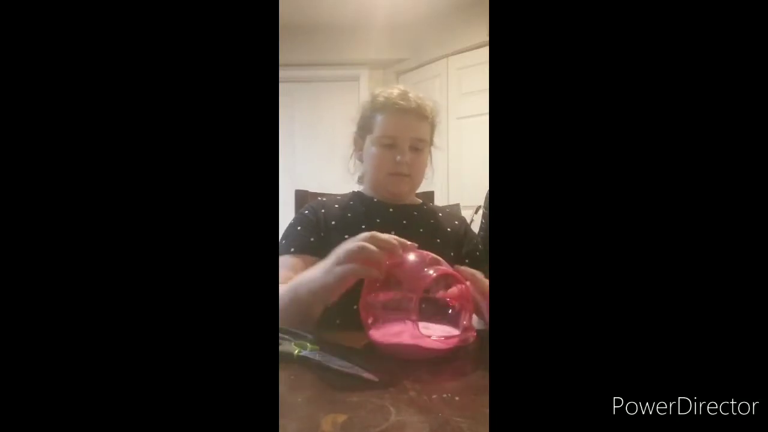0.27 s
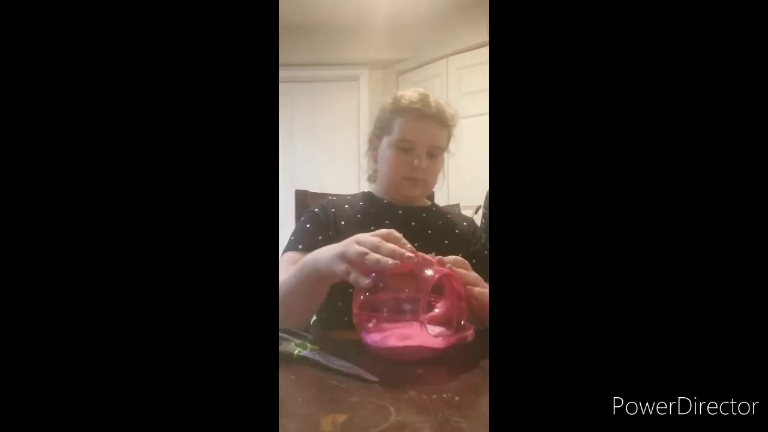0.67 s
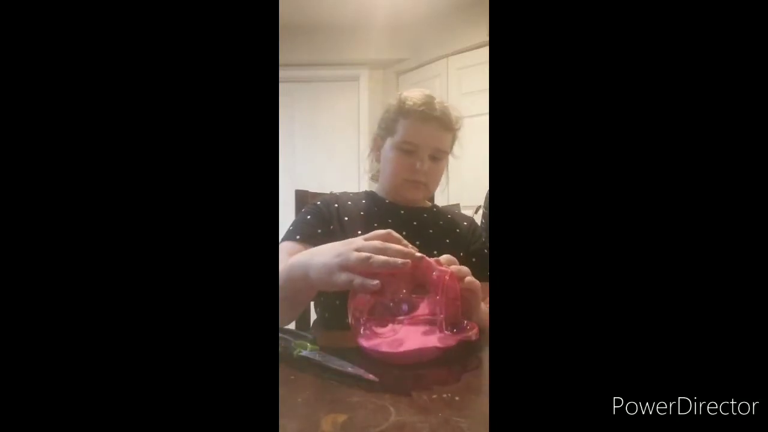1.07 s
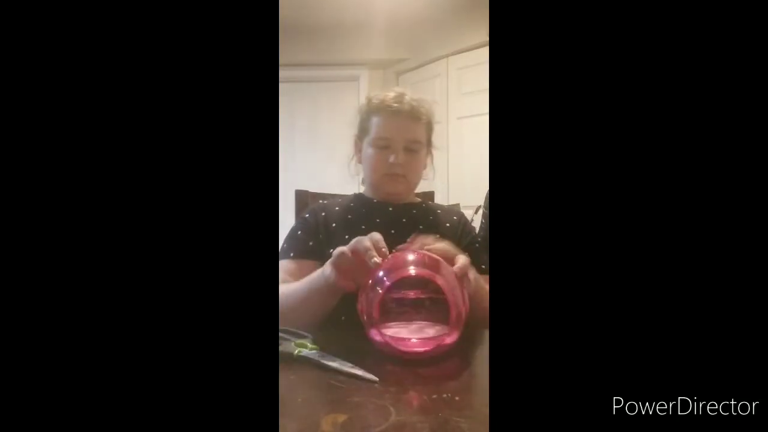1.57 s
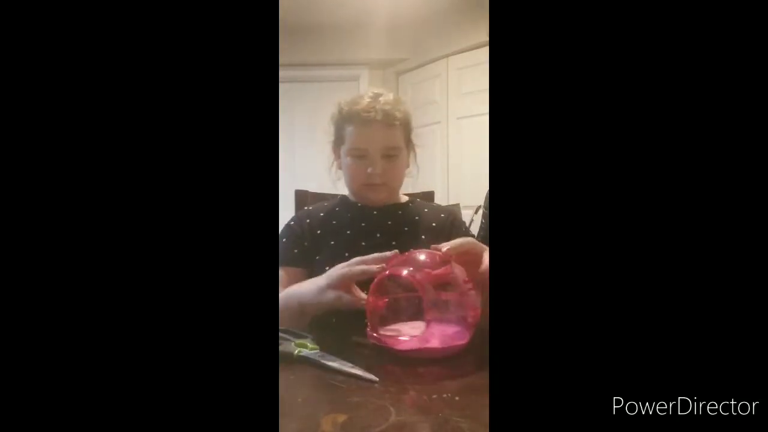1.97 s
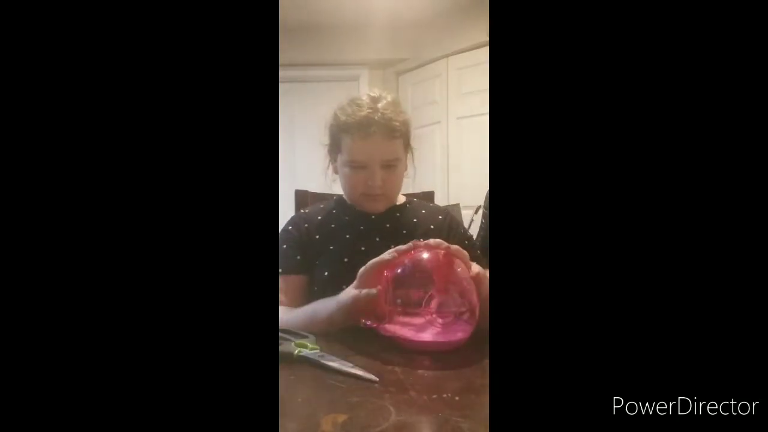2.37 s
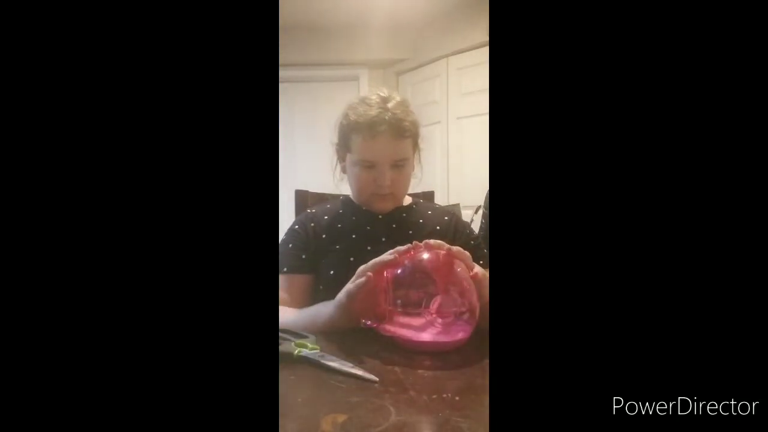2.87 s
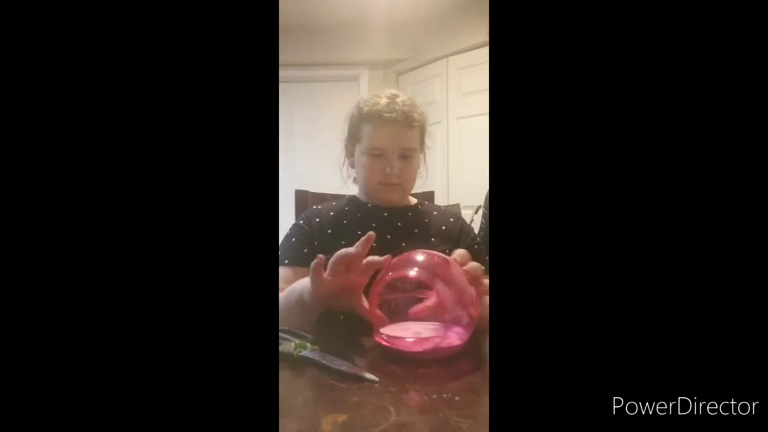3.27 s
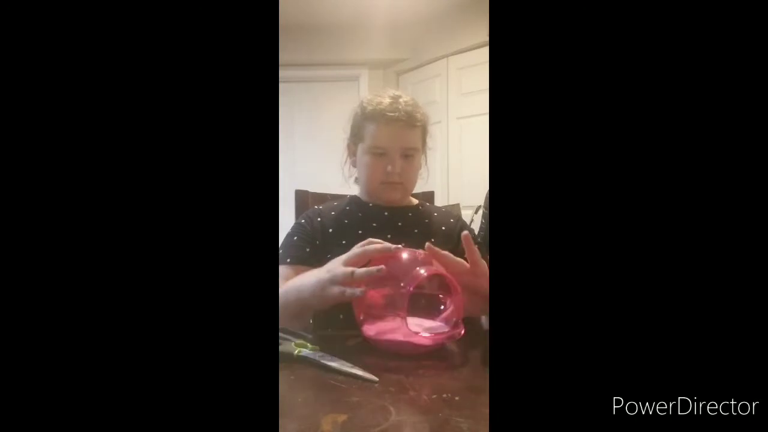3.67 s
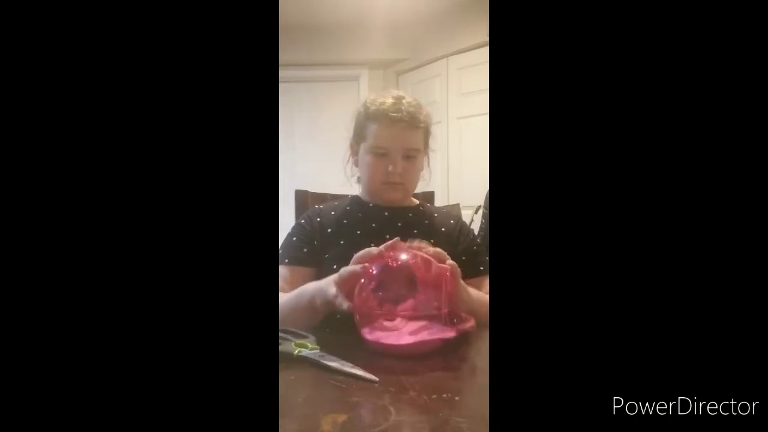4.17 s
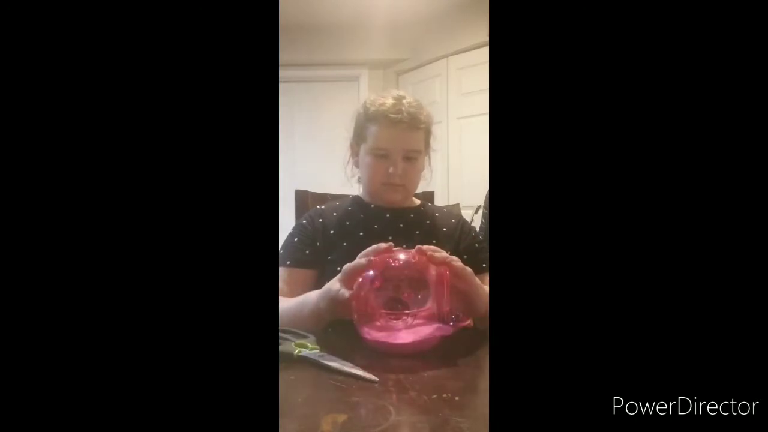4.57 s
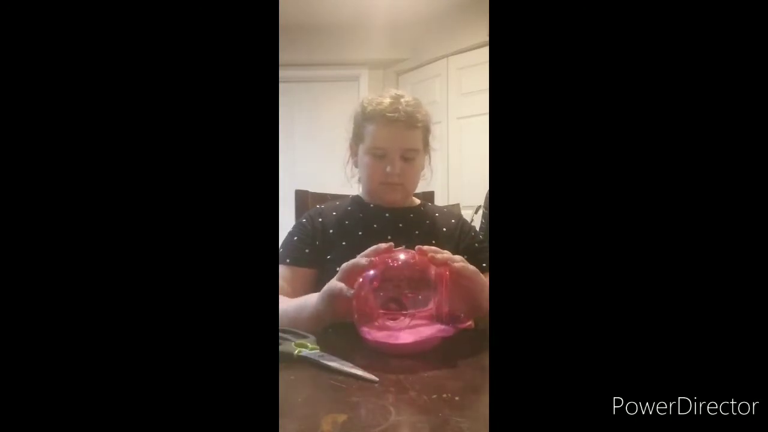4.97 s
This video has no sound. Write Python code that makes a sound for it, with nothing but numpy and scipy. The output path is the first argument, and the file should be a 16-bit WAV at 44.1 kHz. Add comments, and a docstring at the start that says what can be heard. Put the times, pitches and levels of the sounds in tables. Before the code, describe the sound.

In a small hard room with faint, slightly droning tone, a hollow plastic ball is handled on a wooden table, heard by close stereo microphones, with more bass on the right. Low tabletop rumble, a soft thud and short scrapes open it, with a clear hollow knock at 0.28 seconds. Light rubbing and soft bumps continue to 1.1, then rougher strokes from 1.3 to 1.8 with faint high squeaks near 1.5. Bumps and small taps come around 1.95 to 2.1, with a harsher scrape and short squeaks, then a thud at 2.3. At 2.6 the lid snaps home: one very loud, bright crack with a brief room tail. It becomes much quieter, with faint rubs from 2.9 to 3.8. A tight cluster of hollow knocks falls at 3.85, followed by scraping to 4.3, a low bump at 4.4, muffled rubbing, and a rising rough drag from 5.0 to the end.

```python
"""The table top rumbles low over a faint room tone; then come a soft hollow knock, a thud and the first scrapes.
A hollow plastic ball is dragged on a wooden table in a small hard room, and its lid snaps home once, loudly.
Grains of contact noise drive scrape, cavity and rumble; knocks are clicks and noise bursts through resonances.
Thuds are damped swings, squeaks short ringing tones. Two microphone ports on the table hear it, the right one
with more bass; a limiter and a slow gain control react to the peaks."""
import sys
import numpy as np
from scipy import signal
from scipy.fft import rfft, irfft, next_fast_len
from scipy.io import wavfile
from scipy.ndimage import uniform_filter1d

SR = 44100
rng = np.random.default_rng(int(sys.argv[2]) if len(sys.argv) > 2 else 0)


def transcribe(signal):
    """Save signal, clipped to [-1, 1], as a 16-bit WAV file at the path in sys.argv[1]."""
    frames = np.atleast_2d(signal).T
    limited = np.clip(frames, -1, 1)
    pcm = np.round(limited * 32767).astype(np.int16)
    wavfile.write(sys.argv[1], SR, pcm)


N = 230510
SIZE = next_fast_len(N + SR)   # transform length, with room for tails
HZ = np.maximum(np.arange(SIZE // 2 + 1) * SR / SIZE, 1)   # frequency grid

# Colour of the room tone: (frequency [Hz], relative density [dB per Hz])
ROOM_TONE_COLOUR = [(88, -24), (150, -6), (291, -11.5), (375, -20), (901, -30.5), (1380, -42), (4450, -22),
                    (15800, -46.5)]
# Narrow droning bands in the room tone: (frequency [Hz], width [Hz], height [dB])
DRONES = [(243, 27, 19), (1176, 90, 15.5)]
# Room tone ride, sinking for a while after the snap: (time [s], level change [dB])
ROOM_TONE_RIDE = [(0, 0), (2.598, -2.9), (2.9, -11), (3.549, -12.5), (4.0, 4.5), (5.23, -5)]
ROOM_TONE_DB = -55.5   # before the ride

# Rumble of the table top under the hands, before it follows the scrape: (time [s], level [dB])
TABLE_RUMBLE = [(0.0, -43.5), (0.38, -46.5), (0.61, -74), (0.711, -51), (1.15, -57), (1.48, -44.5),
                (1.881, -50.5), (2.21, -45.5), (2.619, -47), (2.72, -64), (3.24, -72.5), (3.61, -71),
                (3.87, -59.5), (4.34, -43.5), (4.63, -44), (4.79, -69.5), (5.05, -51.5), (5.23, -34.5)]
# Strokes of the base over the wood: (start [s], end [s], scrape level at start [dB], at end [dB],
# cavity over scrape [dB], treble over scrape [dB])
STROKES = [(0.064, 0.144, -43.5, -42, -3.5, -5), (0.192, 0.288, -44.5, -44, 2, -8),
           (0.55, 0.793, -51.5, -43.5, 1, -5.5), (0.74, 0.901, -48.5, -44.5, 2, -7.5),
           (0.925, 1.09, -50.5, -52.5, -1, -9), (1.272, 1.328, -40.5, -35.5, -5, -5.5),
           (1.331, 1.52, -37.5, -35.5, 0.5, -3), (1.55, 1.623, -52.5, -49.5, 2, -2),
           (1.636, 1.772, -42, -39, 0, -4), (2, 2.053, -43, -43, 2, -3),
           (2.077, 2.161, -37.5, -27.5, -4.5, -2.5), (2.287, 2.387, -63, -51.5, 4.5, -5),
           (2.903, 2.96, -68, -62.5, 13.5, 2), (3.002, 3.057, -52.5, -59, 0.5, -6),
           (3.087, 3.164, -54, -58.5, 2, -10), (3.185, 3.324, -45.5, -48.5, -1, -4.5),
           (3.357, 3.439, -58.5, -48.5, -1, -1), (3.586, 3.678, -54.5, -58, 1.5, -6),
           (3.678, 3.791, -67, -76, 16.5, 2.5), (3.824, 3.834, -51, -51, 7, -0.5),
           (3.91, 3.983, -46.5, -47, 6.5, -6), (4.03, 4.181, -44, -42.5, -0.5, -6),
           (4.181, 4.272, -40.5, -37.5, -2, -6), (4.347, 4.415, -88.5, -70, 24.5, -6),
           (4.513, 4.69, -62, -57, 7, -21), (4.711, 4.882, -51.5, -59, 9, -21),
           (4.977, 5.026, -54, -45, 4, -15), (5.035, 5.092, -42, -38, 2, -6),
           (5.104, 5.28, -34, -30.5, 1.5, -5.5)]
# Colour of the scrape: (frequency [Hz], relative density [dB per Hz])
SCRAPE_COLOUR = [(290, -20), (500, -7), (931, 0.5), (1710, -2.5), (2520, 1), (3620, -15), (5350, -19.5),
                 (7900, -35), (15800, -33)]
# Ball wall resonances that colour the scrape: (frequency [Hz], width [Hz], mean gain [dB])
WALL_RESONANCES = [(747, 110, 4.5), (1320, 88, 2), (1741, 230, 2), (2260, 120, -3.5), (2850, 130, -4.5),
                   (3610, 110, -2), (4370, 230, -4.5), (5250, 60, -6.5)]
# Colour of the dragged cavity: (frequency [Hz], relative density [dB per Hz])
CAVITY_COLOUR = [(180, 4.5), (250, 8.5), (440, 11), (700, 0), (1000, -41.5)]
# Colour of the table rumble: (frequency [Hz], relative density [dB per Hz])
RUMBLE_COLOUR = [(40, -18.5), (85, 9.5), (130, 4), (210, 10), (320, -44.5)]
ONSET_DB_PER_S, SCRAPE_RELEASE_DB_PER_S, CAVITY_RELEASE_DB_PER_S = 602, 396.5, 246
RUMBLE_FOLLOWS, RUMBLE_REF_DB = 0.19, -54.5   # share of the scrape's swing about this level
CAVITY_UNDER_TABLE_DB = -15.5   # the table also shakes the air in the ball
GRIP_DB, GRIP_PER_S = 5, 12   # spread and rate of the wander in each wall resonance
SPLIT_HZ = 3333   # where treble takes over, in scrape and crack

# Knocks on the shell: (time [s], bright crack drive [dB], dull crack drive [dB], cavity note drive [dB],
# cavity pitch [Hz], cavity rise constant [ms], room send [dB])
KNOCKS = [(0.039, -51, -87, -42, 463, 0.84, -24), (0.2777, -26, -40, -16, 497, 0.71, -17.5),
          (0.5462, -77, -59, -47, 493, 0.64, -18), (1.0781, -76, -66, -38, 503, 0.76, -13),
          (1.959, -52, -53, -39, 504, 1.1, -8), (1.9718, -71, -64, -32, 480, 1.3, -15),
          (1.99, -41, -38, -56, 480, 1, -12.5), (2.0749, -57, -60, -32, 463, 2.4, -3),
          (2.104, -51, -56, -33.5, 413, 4, -7), (2.3144, -54, -49, -37.5, 633, 0.25, -14.5),
          (2.5109, -76, -65, -39, 497, 0.22, -8.5), (2.605, -6, -10.5, -23, 494, 0.89, -7),
          (3.57, -70, -70.5, -34, 458, 2.1, -11.5), (3.6344, -45, -59.5, -59, 477, 1, -16),
          (3.8461, -70, -47, -18.5, 428, 3.8, -5), (3.8539, -33, -39, -13, 442.7, 3.6, -12),
          (3.8598, -23.5, -25.5, -15, 445, 0.47, -16.5), (4.389, -52, -63, -57, 483, 2, -7.5)]
# Shell wall modes: (frequency [Hz], drive over the cavity note at 1 ms rise [dB], 60 dB decay [s])
SHELL_MODES = [(608, -18, 0.087), (935, -13.5, 0.027), (1139, -11, 0.035), (1714, -9.5, 0.03)]
# Colour of the crack: (frequency [Hz], filter gain [dB])
CRACK_COLOUR = [(70, -15.5), (170, 7.5), (320, 5), (520, 14), (900, 7), (1400, -2), (2000, 8), (2900, 3),
                (4500, 5.5), (6300, -7), (8300, -24), (12000, -18.5), (15800, -33.5)]
# Thin edge of the lid, rung by the bright crack: (frequency [Hz], relative drive [dB], 60 dB decay [s])
LID_EDGE = [(4060, 0, 0.02), (4450, -5, 0.015), (4990, 0, 0.02)]
EDGE_HZ, EDGE_T60_S = 4500, 0.002   # what the edge radiates best
CAVITY_T60_S, CAVITY_DELAY_S = 0.042, 0.0012   # the air inside answers a little after the crack
SOFT_DB_PER_MS = 4.5   # a slower push excites the wall modes less

# Hands and base bumping the table: (time [s], peak level of the main swing [dB], pitch [Hz], left over right [dB])
THUDS = [(0.062, -34, 84, -13), (0.272, -32.5, 87, -9), (0.656, -29, 120, -8), (1.047, -30, 109, -12),
         (1.083, -25, 96.5, -11), (1.584, -34.5, 105, -10), (1.953, -25, 127, -15.5),
         (1.981, -22.5, 151, -10.5), (2.319, -23.5, 88.5, -14.5), (2.606, -21.5, 171, -21),
         (2.625, -17.5, 172, -1), (2.905, -46, 165, -17), (2.931, -35, 153, -15), (3.852, -24.5, 115, -11),
         (3.878, -19.5, 217, -5.5), (4.033, -34, 95, -11), (4.394, -22.5, 108, -11),
         (4.458, -29.5, 60.6, -5), (5.071, -29.5, 96.5, -14.5), (5.14, -32.5, 155, -34.5)]
THUD_RISE_S = 0.0088   # time to the peak
THUD_TAIL_DB, THUD_TAIL_T60_S = -4, 0.1   # the table top shudders on after a bump

# Squeaks of the base: (time [s], pitch [Hz], level before the swell [dB])
SQUEAKS = [(1.452, 3620, -45), (1.53, 4340, -45), (2.11, 3580, -34), (2.134, 2745, -33.5)]
SQUEAK_S = 0.024

# Port balance: (frequency [Hz], left over right [dB])
PORT_BALANCE = [(60, -10.5), (150, -7.5), (380, -1.5), (950, -13.5), (2380, 1.5), (5980, -3),
                (15000, -10.5)]
# Likeness of the ports: (frequency [Hz], share of power common to both [0 to 1])
PORT_LIKENESS = [(50, 0.38), (200, 0.77), (600, 0.58), (1500, 0.15), (5000, 0.08), (15000, 1)]
LEFT_LAG_S = 0.00017
# Room decay: (frequency [Hz], 60 dB decay [s])
ROOM_T60 = [(100, 0.46), (500, 0.21), (2000, 0.35), (5000, 0.35), (11000, 0.28)]
# Balance of the reflections: (frequency [Hz], left over right [dB])
ROOM_BALANCE = [(60, -12), (240, 3.5), (3770, 4.5), (15000, -3)]
ROOM_ALIKE_HZ = 645   # above this the ports share ever less of the reflections

LIMIT_DB, LIMIT_RELEASE_DB_PER_S = -3, 444.5
DUCK_FROM_DB, DUCK_SHARE, DUCK_RECOVER_DB_PER_S = -13, 0.26, 0.07
CUTOFF_HZ = 15950


def amp(db):
    """Decibels to gain."""
    return 10 ** (np.asarray(db) / 20)


def rms_one(x):
    """Scale to rms 1."""
    return x / np.sqrt(np.mean(x ** 2) + 1e-20)


def at_hz(points, hz=HZ):
    """Read a (Hz, value) table on a log-frequency axis."""
    point_hz, values = np.transpose(points)
    return np.interp(np.log(hz), np.log(np.maximum(point_hz, 1)), values)


def colour(x, db):
    """Causal (minimum-phase) filter with the given dB on the frequency grid."""
    cepstrum = irfft(db * np.log(10) / 20, SIZE)
    cepstrum[1:SIZE // 2] *= 2   # fold the filter's energy to the front
    cepstrum[SIZE // 2 + 1:] = 0
    response = np.exp(rfft(cepstrum))
    return irfft(rfft(x, SIZE) * response, SIZE)[..., :N]


def humps(rows):
    """Sum (Hz, width, dB) resonances as a dB curve on the frequency grid."""
    return sum(db / (1 + (2 * (HZ - hz) / width) ** 2) for hz, width, db in rows)


def halves(x, db):
    """Colour x and return its parts below and above the split."""
    return [colour(x, db - 10 * np.log10(1 + (HZ / SPLIT_HZ) ** order)) for order in (12, -12)]


def ring(clicks, hz, t60):
    """Two-pole resonator: a unit click sets a decaying sine of starting height 1 ringing."""
    r = amp(-60 / (t60 * SR))
    w = 2 * np.pi * hz / SR
    return signal.lfilter([0, np.sin(w)], [1, -2 * r * np.cos(w), r * r], clicks + 1e-18)


def drift(rate):
    """Slow random wander, spread 1: noise through two equal low-pass poles at rate Hz."""
    r = np.exp(-2 * np.pi * rate / SR)
    wander = signal.lfilter([1], [1, -2 * r, r * r], rng.standard_normal(N + SR))
    return rms_one(wander[SR:])   # the first second settles the filter


def ports(streams):
    """The first stream reaches both ports, later on the left; the others one port each; then balance."""
    common, own = rfft(streams[0], SIZE), rfft(streams[1:], SIZE)
    alike = at_hz(PORT_LIKENESS)
    lag = np.exp(-2j * np.pi * HZ * np.array([[LEFT_LAG_S], [0]]))
    balance = amp(at_hz(PORT_BALANCE) * np.array([[.5], [-.5]]))
    mixed = np.sqrt(alike) * lag * common + np.sqrt(1 - alike) * own
    return irfft(balance * mixed, SIZE)[:, :N]


def room(x):
    """Dense reflections: noise dying by octave band, partly shared by the ports, mostly in the bass."""
    t, tail = np.arange(SR // 2) / SR, 0
    for low in 60 * 2. ** np.arange(8):
        common, *own = rng.standard_normal((3, SR // 2))
        alike = 0.67 / (1 + (low / ROOM_ALIKE_HZ) ** 2)
        white = np.sqrt(alike) * common + np.sqrt(1 - alike) * np.array(own)
        octave = signal.butter(2, [low, 2 * low], "band", fs=SR, output="sos")
        t60 = at_hz(ROOM_T60, np.sqrt(2) * low)
        tail = tail + signal.sosfilt(octave, white) * amp(-60 * t / t60)
    tail = tail * (1 - np.exp(-t / 0.0047))      # reflections need a moment to arrive
    tail = tail / np.sqrt(np.sum(tail ** 2) / 2)
    balance = amp(at_hz(ROOM_BALANCE) * np.array([[.5], [-.5]]))
    return irfft(balance * rfft(x, SIZE) * rfft(tail, SIZE), SIZE)[:, :N]


def ambience():
    """Room tone: coloured noise with a few narrow droning bands, ridden in level."""
    level_db = ROOM_TONE_DB + np.interp(np.arange(N) / SR, *np.transpose(ROOM_TONE_RIDE))
    noise = ports(rng.standard_normal((3, N)))
    return amp(level_db) * rms_one(colour(noise, at_hz(ROOM_TONE_COLOUR) + humps(DRONES)))


def grains(per_s, uneven_db):
    """Three unrelated streams of tiny stick-slip contacts of uneven size and random sign."""
    sizes = amp(uneven_db * np.minimum(rng.exponential(1, (3, N)), 5))
    signs = rng.choice([-1, 1], (3, N))
    return sizes * signs * (rng.random((3, N)) < per_s / SR)


def stroke_db(over_db, release_db_per_s):
    """Level in time of the loudest stroke: quick onset, straight course from start to end, steady release."""
    t = np.arange(N) / SR
    start, end, first_db, last_db = np.transpose(STROKES)[:4, :, None]
    course = np.clip((t - start) / np.maximum(end - start, 1e-3), 0, 1)
    db = first_db + (last_db - first_db) * course + np.asarray(over_db)[:, None]
    db = db - ONSET_DB_PER_S * np.maximum(start - t, 0)
    db = db - release_db_per_s * np.maximum(t - end, 0)
    return np.maximum(db.max(axis=0), -100)


def walls(x):
    """Add the wall resonances to x; shifting hands damp and free each one, as a random wander."""
    out = x
    for hz, width, db in WALL_RESONANCES:
        peak = signal.lfilter(*signal.iirpeak(hz, hz / width, fs=SR), x)
        out = out + amp(db + GRIP_DB * drift(GRIP_PER_S)) * peak
    return out


def dragging():
    """Contacts between base and wood drive the walls, the air inside and the table top."""
    cavity_over_db, treble_over_db = np.transpose(STROKES)[4:]
    scrape_db = stroke_db(0 * cavity_over_db, SCRAPE_RELEASE_DB_PER_S)
    treble_db = stroke_db(treble_over_db, SCRAPE_RELEASE_DB_PER_S)
    table_db = np.interp(np.arange(N) / SR, *np.transpose(TABLE_RUMBLE))
    stroke_cavity = amp(stroke_db(cavity_over_db, CAVITY_RELEASE_DB_PER_S))
    cavity_gain = np.hypot(stroke_cavity, amp(table_db + CAVITY_UNDER_TABLE_DB))
    rumble_db = table_db + RUMBLE_FOLLOWS * (np.maximum(scrape_db, -75) - RUMBLE_REF_DB)
    judder_db = 0.7 * drift(30)      # the base catches and lets go
    fine = ports(grains(per_s=5000.0, uneven_db=2.2))
    coarse = ports(grains(per_s=1500.0, uneven_db=2.5))
    dull, bright = halves(walls(fine), at_hz(SCRAPE_COLOUR))
    scrape = amp(scrape_db + judder_db + 1.0 * drift(43)) * rms_one(dull)
    treble = amp(treble_db + judder_db + 0.86 * drift(16)) * rms_one(bright)
    cavity = cavity_gain * amp(2.2 * drift(25)) * rms_one(colour(coarse, at_hz(CAVITY_COLOUR)))
    rumble = amp(rumble_db + 3.5 * drift(8)) * rms_one(colour(coarse, at_hz(RUMBLE_COLOUR)))
    return scrape + treble + cavity + rumble


def cavity_notes():
    """The air inside swells and dies at a pitch set by how far the hands cover the opening."""
    out, t = np.zeros((2, N)), np.arange(int(.15 * SR)) / SR
    for s, _, _, db, hz, rise_ms, room_db in KNOCKS:
        swell = (1 - np.exp(-1000 * t / max(rise_ms, .3))) ** 2 * amp(-60 * t / CAVITY_T60_S)
        note = swell / swell.max() * np.sin(2 * np.pi * hz * t)
        at = round(s * SR)
        out[:, at:at + len(t)] += amp([[db], [db + room_db]]) * note
    return out


def knock_clicks(db):
    """One click per knock; db gives the heights of the (direct, room send) rows."""
    clicks = np.zeros((2, N))
    clicks[:, np.round(np.transpose(KNOCKS)[0] * SR).astype(int)] = amp(db)
    return clicks


def hollow_body(shares_db):
    """Cavity note and ringing wall modes, softened by the length of the contact."""
    _, _, _, cavity_db, _, rise_ms, _ = np.transpose(KNOCKS)
    spread_db = rng.normal(0, 1.1, (len(SHELL_MODES), len(KNOCKS)))
    out = cavity_notes()
    for (hz, db, t60), uneven_db in zip(SHELL_MODES, spread_db):
        mode_db = cavity_db + db - SOFT_DB_PER_MS * (rise_ms - 1) + uneven_db
        out = out + ring(knock_clicks(mode_db + shares_db), hz, t60)
    contact = np.hanning(int(0.00098 * SR))      # the contact lasts about a millisecond
    out = signal.lfilter(contact / contact.sum(), [1], out)
    out = np.roll(out, int(CAVITY_DELAY_S * SR), axis=1)
    out[1] *= amp(7.0)      # the hollow note radiates all round
    return out


def cracks(shares_db):
    """Hard contact: a fast-dying noise rattle heard direct, and a bare click sent to the room."""
    _, bright_db, dull_db, *_ = np.transpose(KNOCKS)
    rattle = rng.standard_normal(N)
    fade = amp(-60 * np.arange(1500) / SR / 0.044)   # 60 dB decay of 44 ms, cut at 34 ms
    out = np.zeros((2, N))
    for half, (db, gain_db) in enumerate([(dull_db, 5.0), (bright_db, 3.0)]):
        clicks = knock_clicks(db + shares_db)
        direct = amp(gain_db) * rattle * signal.lfilter(fade, [1], clicks[0])
        out += halves(np.array([direct, amp(37.0) * clicks[1]]), at_hz(CRACK_COLOUR))[half]
    return out


def struck():
    """Each blow lands at another spot and rings a mode more or less."""
    return amp(2.0 * rng.standard_normal(N))


def lid_edge(clicks):
    """The thin edge rings its modes through a broad resonance, so it swells into its note."""
    rim = sum(amp(db) * ring(clicks * struck(), hz, t60) for hz, db, t60 in LID_EDGE)
    return ring(rim, EDGE_HZ, EDGE_T60_S) / SR * 8 / EDGE_T60_S


def knocks():
    """Each knock cracks, rings the hollow body and the lid edge, and sends a share to the room."""
    _, bright_db, _, _, _, _, room_db = np.transpose(KNOCKS)
    shares_db = np.array([0 * room_db, room_db])      # rows: direct sound, room send
    direct, send = hollow_body(shares_db) + cracks(shares_db)
    bright_clicks = knock_clicks(bright_db + shares_db)
    direct = direct + lid_edge(bright_clicks[0])
    top = signal.butter(4, 8500, "high", fs=SR, output="sos")
    send = send + signal.sosfilt(top, amp(26.0) * bright_clicks[1])   # extra air in the room
    return ports(np.array([direct, direct, direct])) + room(send)


def thuds():
    """A soft push swings the table top up within a cycle or so; damping stops the swing, a shudder lingers."""
    out, t = np.zeros((2, N)), np.arange(int(.2 * SR)) / SR
    u = t / THUD_RISE_S
    for s, db, hz, pan_db in THUDS:
        swing = np.cos(2 * np.pi * hz * (t - THUD_RISE_S)) * (u * np.exp(1 - u)) ** 3.1
        shudder = rms_one(ring(rng.standard_normal(len(t)), hz, 0.024)) * np.minimum(u, 1)
        thud = swing + amp(THUD_TAIL_DB - 60 * t / THUD_TAIL_T60_S) * shudder
        at = round(s * SR)
        out[:, at:at + len(t)] += amp(db) * thud[:N - at] * amp([[pan_db / 2], [-pan_db / 2]])
    return out


def squeaks():
    """For a moment the base slips in step with a wall resonance and sings: noise through a resonator."""
    out, swell = np.zeros(N), np.hanning(int(SQUEAK_S * SR))
    for s, hz, db in SQUEAKS:
        tone = rms_one(ring(rng.standard_normal(len(swell)), hz, SQUEAK_S))
        out[round(s * SR):][:len(swell)] += amp(db) * swell * tone
    return ports(np.array([out, out, out]))


def scene():
    """Everything on the table, a little of the dragging also through the room."""
    tone, drag = ambience(), dragging()
    drag_in_room = amp(-13.5) * room(drag[1])
    return tone + drag + drag_in_room + knocks() + thuds() + squeaks()


def held(over_db, db_per_s):
    """Follow rises at once, let go at a steady rate."""
    fall = db_per_s * np.arange(N) / SR
    return np.maximum.accumulate(over_db + fall) - fall


def record(dry):
    """A fast limiter tames peaks, a slow gain control ducks after them; deep bass and top are cut."""
    level_db = 20 * np.log10(np.abs(dry).max(axis=0) + 1e-9)
    limit_db = held(np.maximum(level_db - LIMIT_DB, 0), LIMIT_RELEASE_DB_PER_S)
    limit_db = uniform_filter1d(limit_db, size=88, origin=-22)   # 2 ms smoothing that looks ahead
    duck_db = held(DUCK_SHARE * np.maximum(level_db - DUCK_FROM_DB, 0), DUCK_RECOVER_DB_PER_S)
    step = 1 / (.1 * SR)   # the ducking glides over about 0.1 s
    duck_db = signal.lfilter([step], [1, step - 1], duck_db)
    bass_cut = signal.butter(5, 42, "high", fs=SR, output="sos")
    top_cut = signal.cheby2(20, 80, CUTOFF_HZ, fs=SR, output="sos")
    out = signal.sosfilt(bass_cut, dry * amp(-limit_db - duck_db))
    return signal.sosfilt(top_cut, out)


dry = scene()
out = record(dry)
transcribe(out)
```